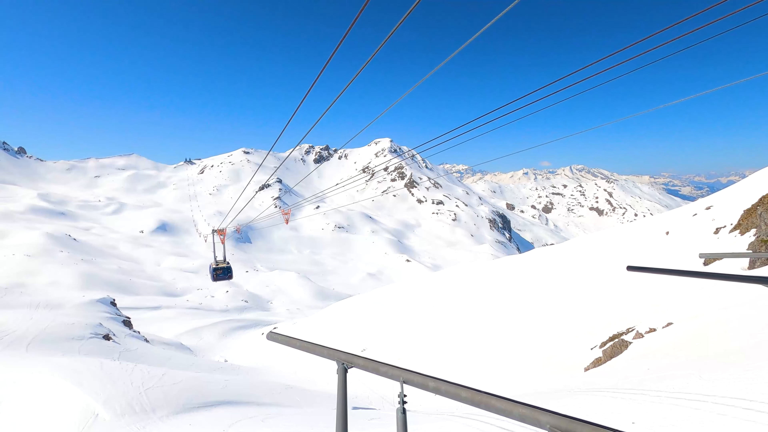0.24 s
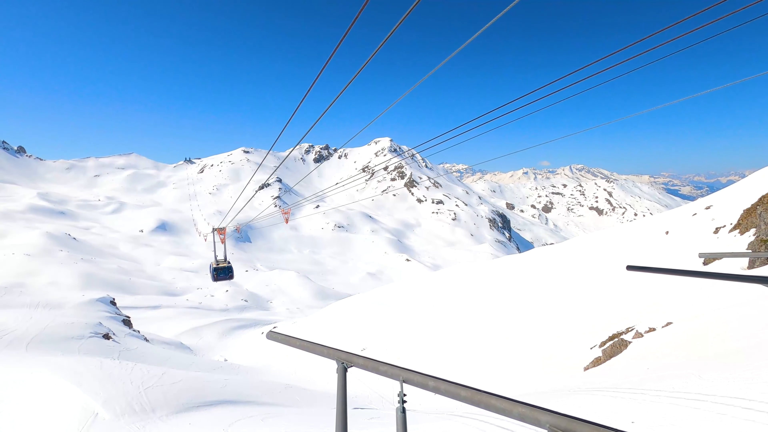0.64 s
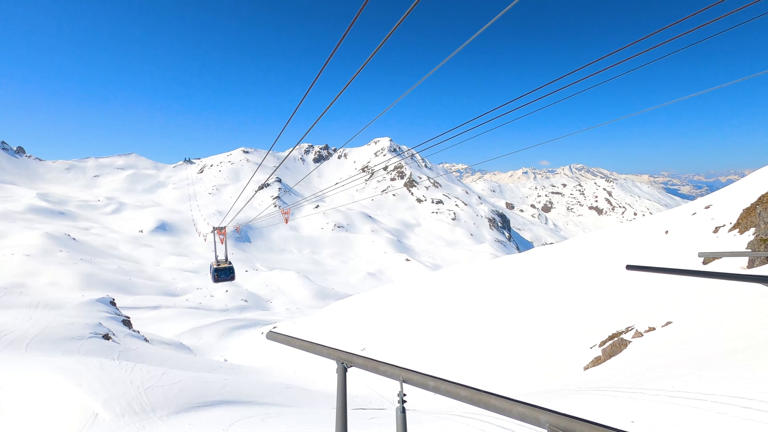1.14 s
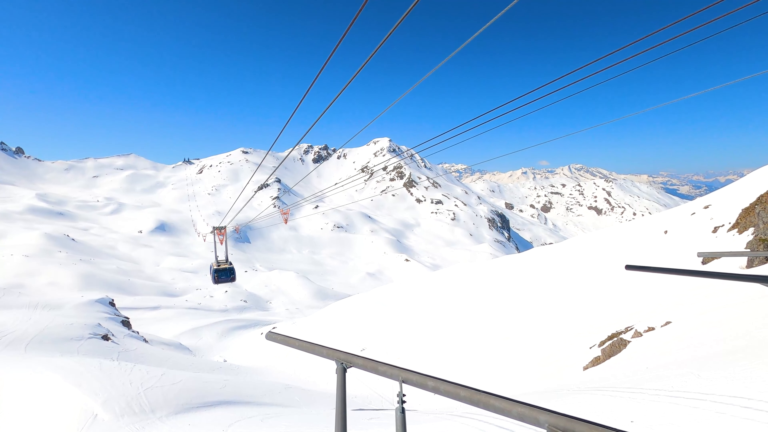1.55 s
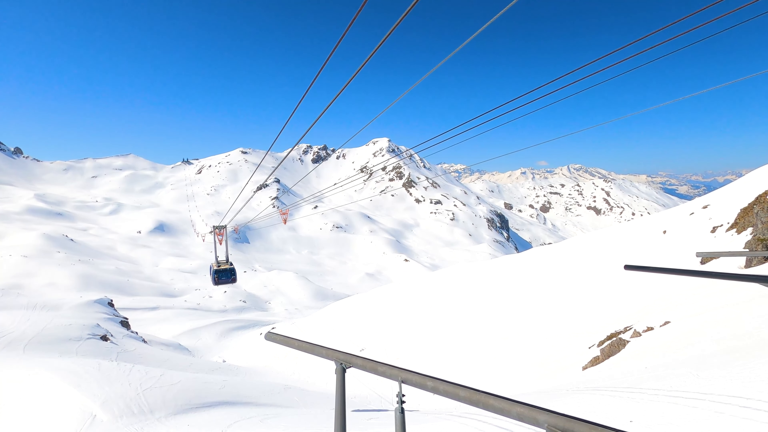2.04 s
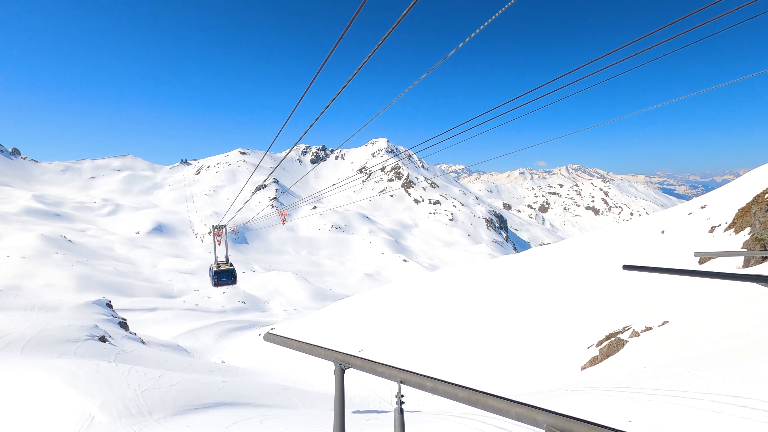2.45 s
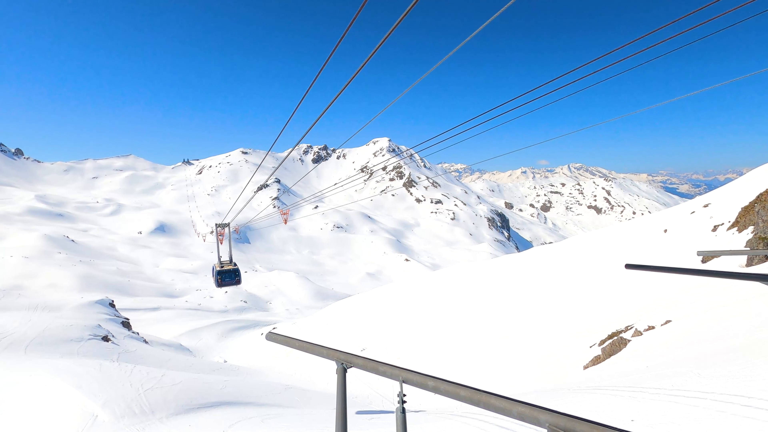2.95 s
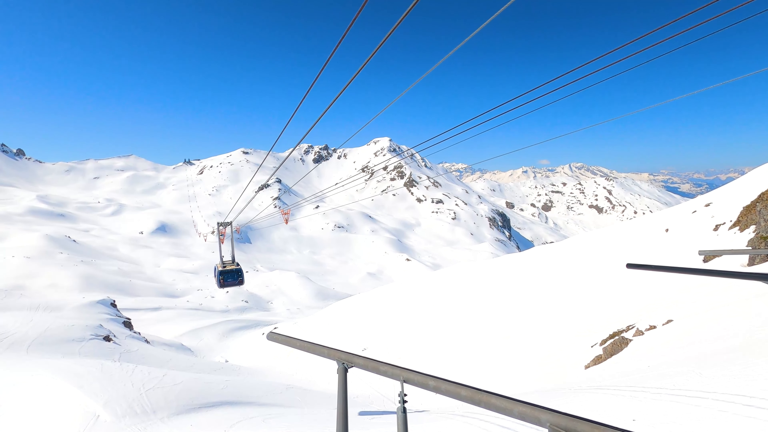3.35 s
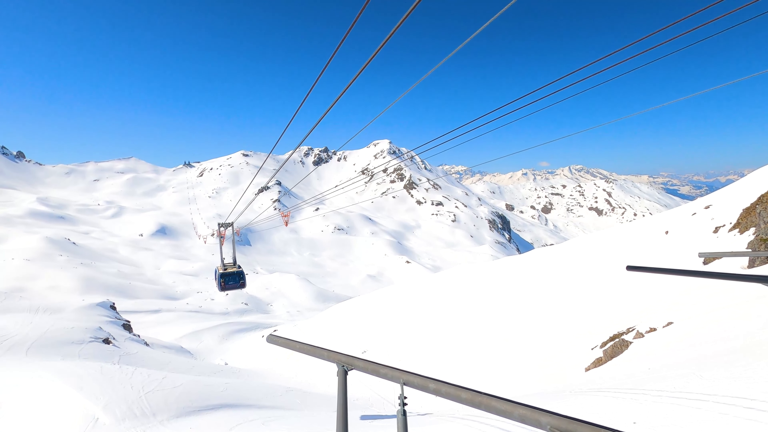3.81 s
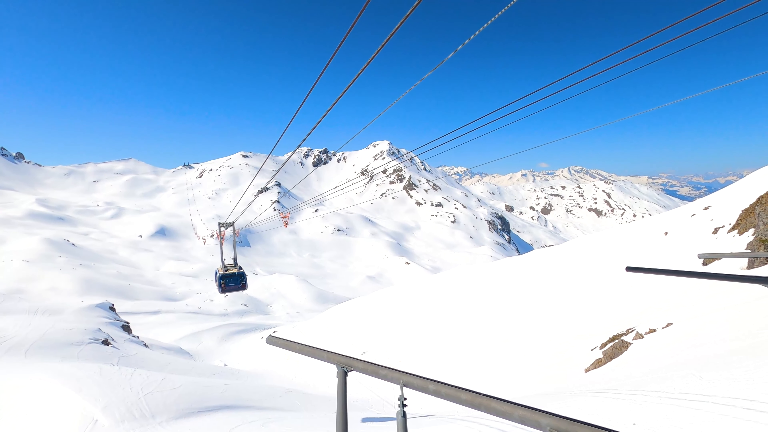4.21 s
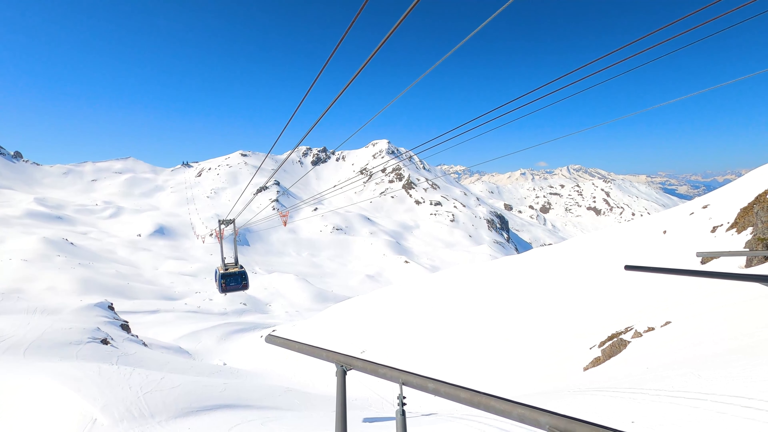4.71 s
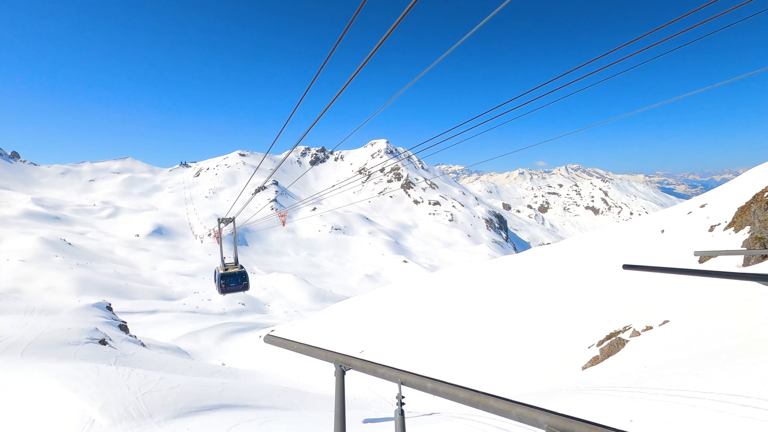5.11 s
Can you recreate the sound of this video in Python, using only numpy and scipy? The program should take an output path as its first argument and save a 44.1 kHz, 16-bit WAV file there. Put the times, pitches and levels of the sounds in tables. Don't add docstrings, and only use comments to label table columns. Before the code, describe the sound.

Close stereo microphones at an open mountain cable car station pick up a deep pulsing hum that slowly drops as the drive brakes. Wheels roar and rumble beneath, with faint scraping hisses. A second wheel sings for half a second past the middle, then a bright little clink comes near the end. Low wind buffets throughout; the image starts narrow and opens wide.

```python
import sys
import numpy as np
from scipy import signal
from scipy.fft import rfft, irfft, next_fast_len
from scipy.io import wavfile
from scipy.ndimage import uniform_filter1d, map_coordinates

SR = 44100
rng = np.random.default_rng(int(sys.argv[2]) if len(sys.argv) > 2 else 0)


def dump_mix(stems):
    frames = np.atleast_2d(stems).T
    limited = np.clip(frames, -1, 1)
    pcm = np.round(limited * 32767).astype(np.int16)
    wavfile.write(sys.argv[1], SR, pcm)


def magnitude_from_level(level_db):
    exponent = np.asarray(level_db, float) / 20
    return 10 ** exponent


N = 258867
TIME = np.arange(N) / SR
FREQ = np.fft.rfftfreq(next_fast_len(N), 1 / SR)

# pitch in Hz, level in dB.
WIND_COLOUR = [(12, -14.5), (25, 3.5), (42, 5.5), (62, 5.5), (90, -1.5), (150, -10), (300, -57.5), (2000, -110)]
FLAP_COLOUR = [(40, -19.5), (100, 7.5), (200, -12.5), (400, -29.0), (2000, -100)]
# centre in seconds, length in seconds, shared level in dB, level apart at the ports in dB.
GUSTS = [(.29, 0.056, -27.5, -60), (.63, 0.095, -35, -60.5), (1.102, 0.092, -33.5, -64),
         (1.44, .07, -42, -61), (1.922, 0.14, -44, -62), (2.314, .06, -39, -61.5), (2.6, 0.089, -45, -56.5),
         (2.86, 0.042, -36, -55.5), (3.176, 0.1, -38, -46.5), (3.547, .07, -40, -56),
         (3.854, 0.059, -39, -40), (4.035, 0.059, -41, -44), (4.183, 0.047, -33.5, -45),
         (4.468, 0.071, -41.5, -47.5), (4.786, 0.045, -44, -58), (5.15, 0.081, -42, -55.5),
         (5.547, .12, -42, -50), (5.87, 0.089, -36.5, -42)]
CALM_DB, CALM_APART_DB = -49.5, -56

# pitch in Hz, level in dB.
WHINE_LINES = [(479, -55), (598, -58), (716, -51), (835, -48), (1077, -58), (1200, -58), (3400, -58)]
# time in seconds, level in dB.
WHINE_SWELL = [
    (3.4, -30),
    (3.55, 2),
    (3.7, 4),
    (3.9, 1.5),
    (4.02, -45),
]

# pitch in Hz, level in dB, time to fall by 60 dB in seconds.
FITTING_MODES = [(5730, -2, .08), (5800, -1, .1), (6280, -5, .08), (6990, -4, .14), (7030, -1, .25),
                 (7560, -9, .15), (7860, -7, .12), (7910, -7, .15), (8630, -17, .1), (10500, -26, .08),
                 (11900, -28, .05), (13100, -27, .05)]
# start in seconds, length in seconds, level in dB, brightness in dB per octave.
RATTLES = [
    (1.42, .04, -62, 2),
    (3.37, .03, -60, 2),
    (4.36, .03, -68, 6),
    (5.135, .055, -43, 0),
]

# pitch in Hz, level in dB.
ROAR_COLOUR = [(400, -33.5), (700, -6.5), (1000, 3.5), (1600, 2), (2200, -1.5), (2850, -1.5), (3600, -5.5),
               (4600, -14.5), (5800, -15.5), (6800, -28), (8000, -46.5), (11000, -91)]
RUMBLE_COLOUR = [(40, -10.5), (70, 2.5), (110, 17.5), (170, 9.5), (260, 10), (330, 6.5), (450, 1.5),
                 (560, -1.5), (660, 3), (800, -2.5), (1000, -10.5), (1500, -60.5), (4000, -81)]
HISS_COLOUR = [(3000, -36), (5000, -7.5), (6500, -0.5), (7600, -4), (8300, -11.5), (9500, -18),
               (10500, -28.5), (12000, -40.5), (15000, -68.5)]
# time in seconds, roar level in dB.
LOAD = [(.27, -44.5), (.6, -44.5), (.92, -45), (1.05, -49), (1.63, -51.5), (2.11, -51), (2.3, -49),
        (2.92, -49), (3.45, -48), (3.68, -44.5), (4.0, -49), (4.7, -50), (4.9, -49), (5.04, -45.5),
        (5.2, -44.5), (5.3, -48), (5.62, -45.5), (5.85, -43)]
RUMBLE_DB, RUMBLE_DB_PER_S, DRONE_DB, DRONE_DB_PER_S = 7.8, -1.4, 0.9, -0.92
RUMBLE_IGNORES, HISS_FOLLOWS = .4, .3
HISS_DB = -80.5
# centre in seconds, length in seconds, lift in dB.
SECOND_WHEEL = [
    (3.85, 0.33, 5.5),
    (5.052, 0.072, 2),
]
# centre in seconds, length in seconds, hiss level in dB.
SCRAPES = [(.85, 0.062, -81.5), (1.445, .05, -79.5), (2.3, 0.075, -81), (2.496, 0.051, -80),
           (2.776, 0.044, -85), (3.0, 0.05, -85.5), (3.387, .04, -80.5), (3.704, .12, -77),
           (4.403, .04, -90), (5.045, 0.027, -82), (5.171, .03, -72), (5.8, .05, -76.5)]
# pitch in Hz, level under the roar in dB.
UNSHARED = [(300, -37.5), (600, -22.5), (1000, -20.5), (1600, -16.5), (2700, -17.5), (4000, -10.5),
            (5200, -1.5), (6500, -5), (8000, -2.5), (11000, -9)]

STRANDS = 6
STRAND_HZ, SLOWING_HZ_PER_S, BRAKING_HZ_PER_S2 = 137.8, 5.0, .08
# time in seconds, level in dB.
BEAT = [(.27, -23.5), (.42, -25.5), (.6, -19), (.92, -15.5), (1.25, -18.5), (1.75, -16), (2.0, -24.5),
        (2.2, -19.5), (2.45, -20.5), (2.78, -27), (3.05, -24.5), (3.3, -16), (3.65, -21), (4.3, -15.5),
        (4.65, -21.5), (5.1, -19), (5.5, -23), (5.75, -19)]
# pitch in Hz, width in Hz, level in dB.
WHEEL_FRAME = [(270.7, 1.7, -27.5), (264.9, 1.1, -34), (261.5, .9, -33), (256, 1.6, -40), (252.8, 1.1, -32),
               (249.9, .6, -33), (246.6, .9, -34), (243.6, 1.5, -30), (239, 1.6, -28.5), (233.9, 1.7, -30),
               (229, 1.2, -41), (223.9, .8, -39), (219.8, 1.8, -33), (214, 1.6, -32.5)]
GIRDERS = [(405.4, 1.6, -39), (399.7, 1.1, -47), (392.2, .7, -48), (384.5, 1.8, -45), (378, 1.5, -49),
           (368.7, 1.2, -49), (360.8, 1.8, -39), (356.6, .9, -41), (352.9, 1.5, -40), (344.5, 2.1, -42),
           (339.3, 1.8, -44), (331, .9, -40), (327.2, .9, -48), (318, 1.8, -37)]
RAILINGS = [(543, 1.5, -49), (535.5, 3.5, -45), (525.7, 2.1, -51), (481.7, 3.5, -49), (470.6, 2.6, -50),
            (444.4, 2.1, -51), (423, 2.1, -49)]
ROOF = [(676, 3, -49), (661, 2.5, -52), (648, 3, -55), (636, 2.1, -55), (621.3, 3.5, -52),
        (611.8, 1.5, -51), (579.8, 3, -57)]
OFF_RESONANCE_DB = [-46, -58.5, -63.5, -64]
# pitch in Hz, width in Hz.
CANCELS = [(127.16, .5), (125.77, .45), (124.15, .5), (122.52, .35), (111.55, .45), (109, .55),
           (266.98, .4), (258.98, .5), (250.7, .4), (248.5, .6), (227.4, .5), (217.2, .6)]
# pitch in sixths of the beat pitch, level in dB.
SIDE_TONES = [(5, -3.5), (7, -1), (11, -6.5), (13, -9), (17, -21), (19, -13), (23, -12.5), (25, -18),
              (29, -18.5)]
LOWER_SIDE_DB, UPPER_SIDE_DB = -45.5, -42
# centre in seconds, length in seconds, level in dB.
SPLICE = [
    (0.357, 0.071, -29.5),
]

# pitch in Hz, left minus right in dB.
PORT_BALANCE = [(500, 0), (910, .5), (1580, 2), (2720, 2.5), (4680, 6), (6300, 3), (8070, -1)]
# pitch in Hz, lead of the left in radians.
PORT_PHASE = [(500, 0), (1210, -.1), (2410, -.5), (4650, -1.1), (5340, 1.4), (6370, 0), (8270, .6)]
# time in seconds, level in dB.
FADE_IN = [(.2, -70), (.21, -47), (.225, -23.5), (.24, -16), (.255, -4.5), (.28, 0)]
BLEND_S, BLEND_TAU_S, GUARD_WIDTH, FULL_WIDTH = 2.89, 0.99, .025, 1.24


def curve(table):
    s, value = np.transpose(table)
    return np.interp(TIME, s, value)


def across(table, freq=FREQ):
    hz, value = np.transpose(table)
    return np.interp(np.log(freq + 1), np.log(hz + 1), value)


def coloured(x, gain):
    size = next_fast_len(N)
    return irfft(rfft(x, size) * gain, size)[:N]


def unit(x, lo_hz, hi_hz):
    return x / np.std(coloured(x, (FREQ > lo_hz) & (FREQ < hi_hz)))


def walk(rate):
    k = max(int(SR / rate), 1)
    held = np.repeat(rng.standard_normal(N // k + 1), k)
    return 2.09 * uniform_filter1d(uniform_filter1d(held, k), k)[:N]


def swells(x, rows, floor_db=-200):
    bumps = sum(magnitude_from_level(db) * np.exp(-.5 * ((x - c) / w) ** 2) for c, w, db in rows)
    return 20 * np.log10(magnitude_from_level(floor_db) + bumps)


def shimmer(colour, flicker_db, rate, ring_db, source):
    hz, s, bins = signal.stft(source, SR, nperseg=2048, noverlap=1536)
    grid = np.meshgrid(2 * np.log2(hz / 20 + 1), s * rate, indexing="ij")
    broad = map_coordinates(rng.standard_normal((24, 256)), grid, order=1, mode="wrap")
    narrow = uniform_filter1d(rng.standard_normal(bins.shape), size=16, axis=1)
    narrow = uniform_filter1d(narrow, size=2, axis=0)
    ringing = np.clip(narrow / narrow.std(), -2, 2)
    db = across(colour, hz)[:, None] + flicker_db * broad + ring_db * ringing
    return signal.istft(bins * magnitude_from_level(db), SR, nperseg=2048, noverlap=1536)[1][:N]


def wind():
    def turbulence(colour):
        return coloured(rng.standard_normal(N), magnitude_from_level(across(colour)))

    shared_db = swells(TIME, np.array(GUSTS)[:, :3], CALM_DB) + 0.61 * walk(16)
    shared = unit(turbulence(WIND_COLOUR), 17, 130) * magnitude_from_level(shared_db)
    apart_rows = np.delete(GUSTS, obj=2, axis=1)
    gust = magnitude_from_level(swells(TIME, apart_rows, CALM_APART_DB) + 3.0 * walk(9))
    thud = unit(turbulence(WIND_COLOUR), 20, 90) * gust
    flap = unit(turbulence(FLAP_COLOUR), 90, 150) * magnitude_from_level(27) * gust ** 2
    return shared, thud + flap


def whine():
    lines = 0
    for hz, db in WHINE_LINES:
        level = magnitude_from_level(db + .8 * walk(9))
        lines = lines + level * np.sin(2 * np.pi * hz * TIME + 0.44 * walk(7.0))
    singing = np.abs(TIME - 3.7) < .35
    return np.sqrt(2) * magnitude_from_level(curve(WHINE_SWELL)) * singing * lines


def fitting():
    out, t = np.zeros(N), np.arange(SR // 3) / SR
    for s, length, db, tilt_db in RATTLES:
        knocks = rng.uniform(-1, 1, (24, 2))
        push = np.zeros(int(.1 * SR))
        at = np.clip(np.abs(knocks[:, 0]) * length * SR, 0, len(push) - 1).astype(int)
        push[at] = knocks[:, 1] / 3
        ring = 0
        for hz, mode_db, t60 in FITTING_MODES:
            level = magnitude_from_level(mode_db + tilt_db * np.log2(hz / 7000))
            ring = ring + level * np.sin(2 * np.pi * hz * t) * magnitude_from_level(-60 * t / t60)
        click = coloured(rng.standard_normal(N), (FREQ > 4500) & (FREQ < 9000))[:len(t)]
        ring = ring + .2 * click * magnitude_from_level(-60 * t / .01)
        sound = signal.fftconvolve(push, ring * (1 - np.exp(-t / .001)))
        start = int(s * SR)
        out[start:start + len(sound)] += magnitude_from_level(db) * sound / np.abs(sound).max()
    return out


def machinery(phase):
    roar_db = curve(LOAD)
    load_db = roar_db - roar_db.mean()
    rumble_db = RUMBLE_DB + RUMBLE_DB_PER_S * TIME - RUMBLE_IGNORES * load_db
    drone_db = DRONE_DB + DRONE_DB_PER_S * TIME
    for s, length, db in SECOND_WHEEL:
        drone_db = drone_db + db * np.exp(-.5 * ((TIME - s) / length) ** 2)
    hiss_db = swells(TIME, SCRAPES, HISS_DB + HISS_FOLLOWS * load_db)
    upper = np.clip(np.log2((FREQ + 1) / 1400), 0, 1)

    def shaken():
        return rng.standard_normal(N) * (1 + .1 * np.sin(phase))

    def rolling():
        sound = shimmer(ROAR_COLOUR, 0.81, 10, 2.54, shaken())
        drone = unit(coloured(sound, 1 - upper), 830, 2200) * magnitude_from_level(drone_db)
        roar = unit(sound, 2300, 6000)
        hiss = unit(shimmer(HISS_COLOUR, 0.68, 11, 1.7, shaken()), 7680, 10500)
        return magnitude_from_level(roar_db) * (coloured(roar, upper) + drone) + magnitude_from_level(hiss_db) * hiss

    rumble = unit(shimmer(RUMBLE_COLOUR, 2.4, 12, 2.04, shaken()), 367, 690)
    together = rolling() + magnitude_from_level(roar_db + rumble_db - 0.36) * rumble
    return together, coloured(rolling(), magnitude_from_level(across(UNSHARED)))


def cancelling(hz):
    dips = [np.sqrt(((hz - c) ** 2 + (0.22 * w) ** 2) / ((hz - c) ** 2 + w ** 2)) for c, w in CANCELS]
    return np.prod(dips, axis=0)


def rope():
    hz = STRAND_HZ - SLOWING_HZ_PER_S * TIME - BRAKING_HZ_PER_S2 * TIME ** 2
    phase = 2 * np.pi * np.cumsum(hz) / SR
    steel = [WHEEL_FRAME, GIRDERS, RAILINGS, ROOF]
    levels = [uniform_filter1d(curve(BEAT), size=SR // 25)]
    levels += [swells((k + 2) * hz, steel[k], db) for k, db in enumerate(OFF_RESONANCE_DB)]
    hum = 0
    for k, db in enumerate(levels):
        level = cancelling((k + 1) * hz) * magnitude_from_level(db + 0.67 * walk(18))
        hum = hum + level * np.sin((k + 1) * (phase + 0.02 * walk(8)) - k * np.pi / 2)
    below_db, above_db = swells(TIME, SPLICE, LOWER_SIDE_DB), UPPER_SIDE_DB
    for k, db in SIDE_TONES:
        sixths = round(k)
        uneven_db = above_db if sixths % STRANDS == 1 else below_db
        level = magnitude_from_level(uneven_db + db + 2.2 * walk(6))
        hum = hum + level * np.sin(sixths * phase / STRANDS + .8 * walk(6))
    return np.sqrt(2) * hum, phase


def scene():
    hum, phase = rope()
    roar, apart = machinery(phase)
    shared, buffet = wind()
    clink = fitting()
    middle = hum + roar + whine() + clink + shared
    lean = magnitude_from_level(across(PORT_BALANCE) / 2) * np.exp(.5j * across(PORT_PHASE))
    side = apart + buffet - .25 * clink
    return np.array([coloured(middle, lean) + side, coloured(middle, 1 / lean) - side])


def roll_off(x):
    return signal.sosfilt(signal.butter(12, 13500, fs=SR, output="sos"), x)


def record(dry):
    opening = 1 - np.exp(-np.clip(TIME - BLEND_S, 0, None) / BLEND_TAU_S)
    width = GUARD_WIDTH + FULL_WIDTH * opening
    mid, side = (dry[0] + dry[1]) / 2, (dry[0] - dry[1]) / 2 * width
    fade = magnitude_from_level(curve(FADE_IN)) * (TIME > FADE_IN[0][0])
    mix = fade * np.array([mid + side, mid - side])
    return roll_off(mix)


dry = scene()
out = record(dry)
dump_mix(out)
```